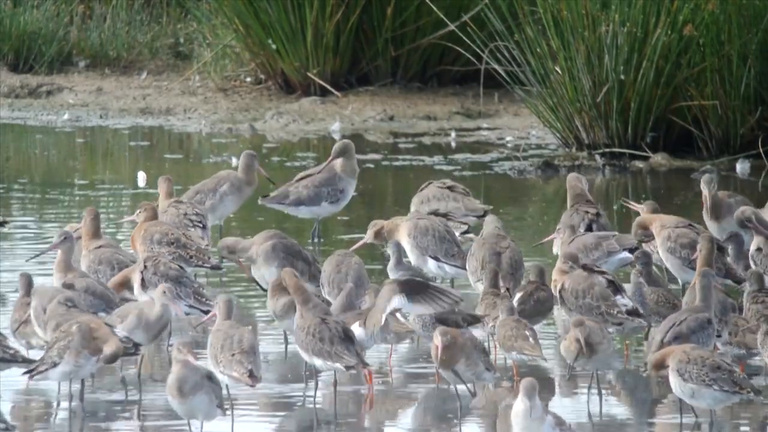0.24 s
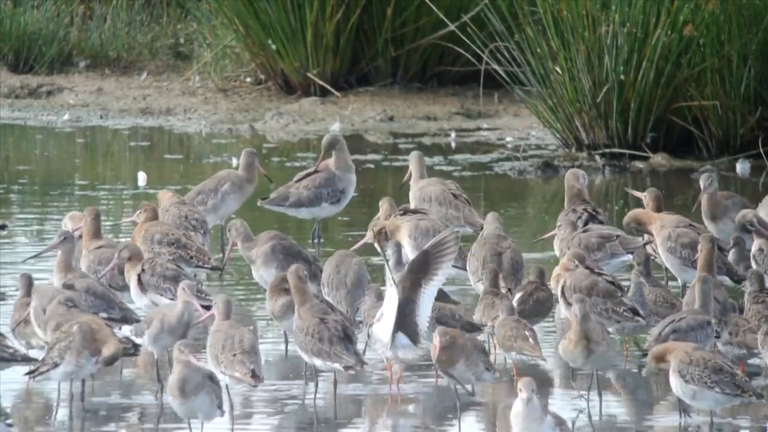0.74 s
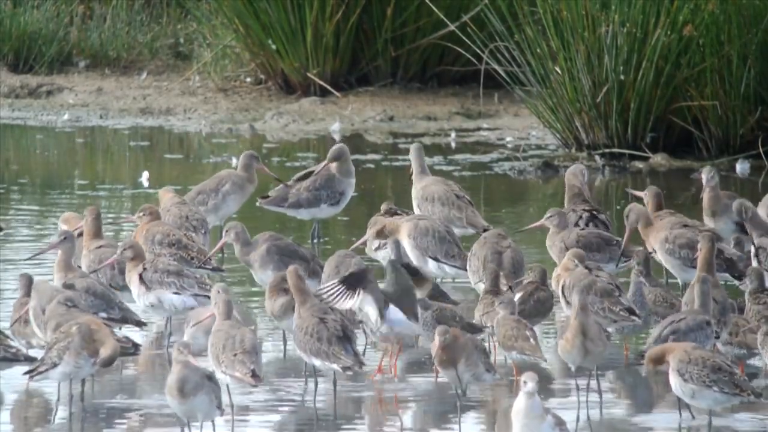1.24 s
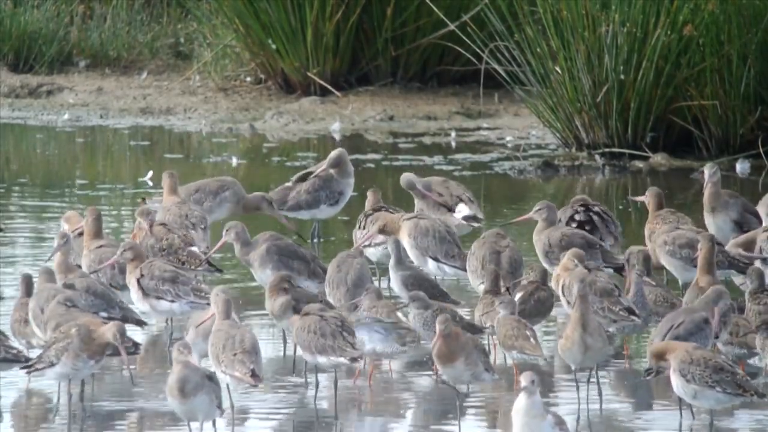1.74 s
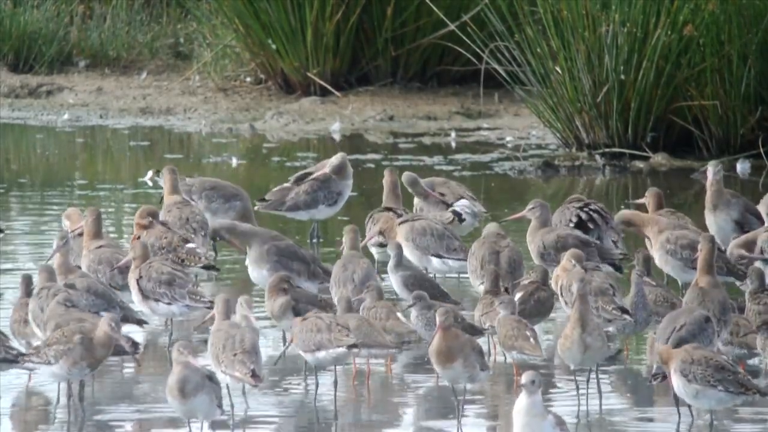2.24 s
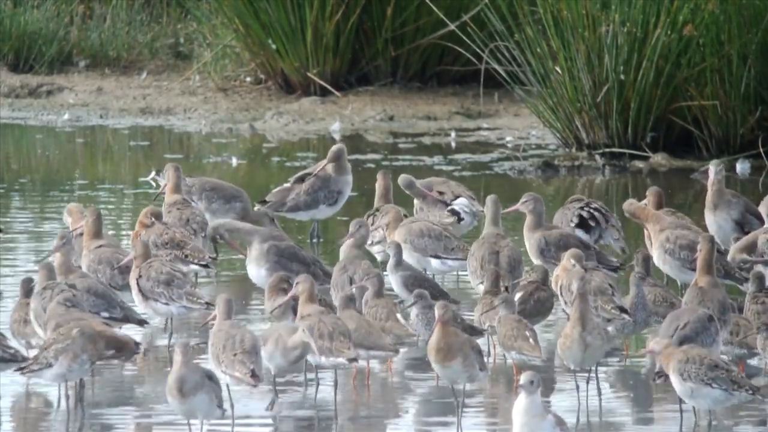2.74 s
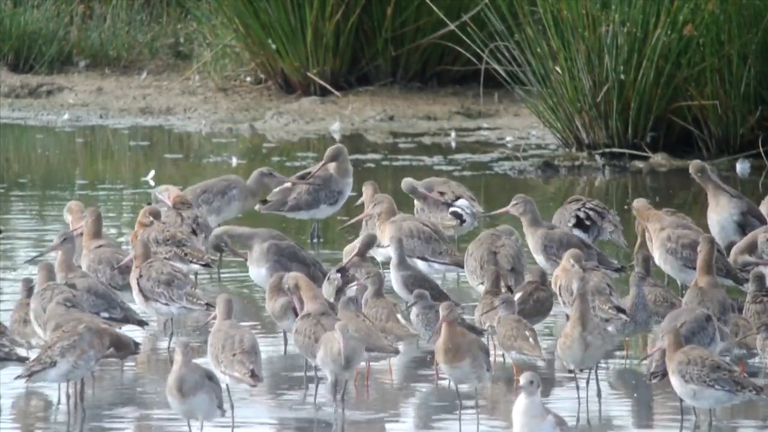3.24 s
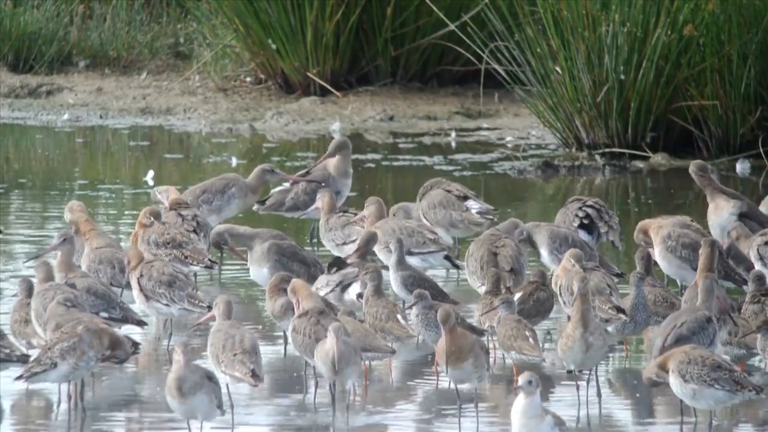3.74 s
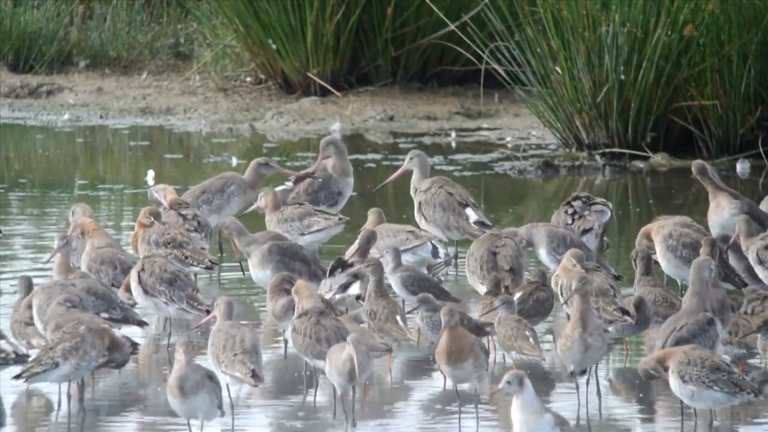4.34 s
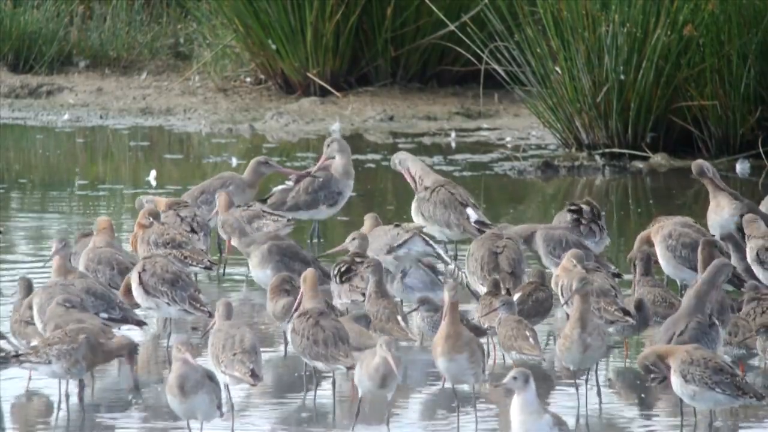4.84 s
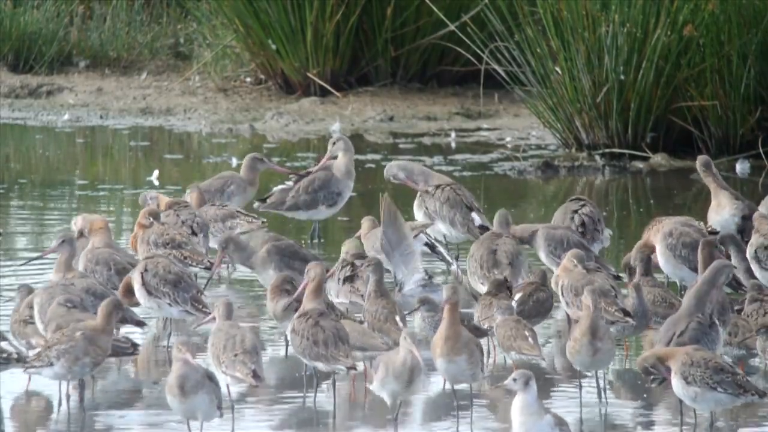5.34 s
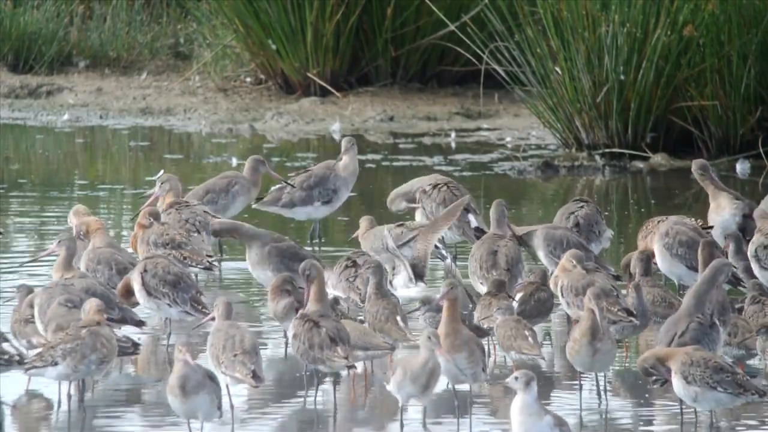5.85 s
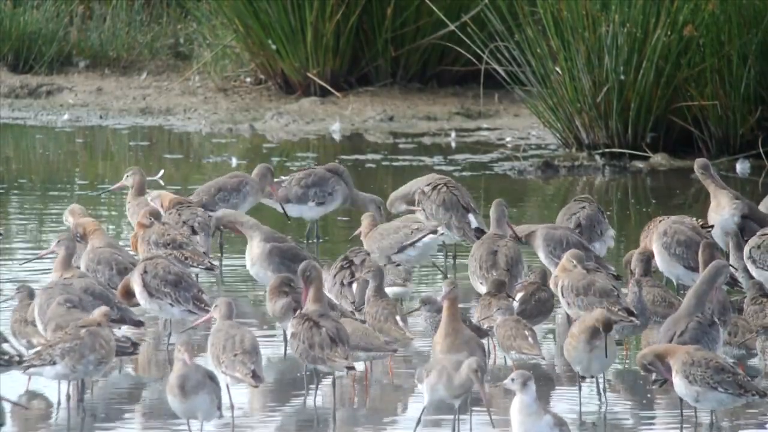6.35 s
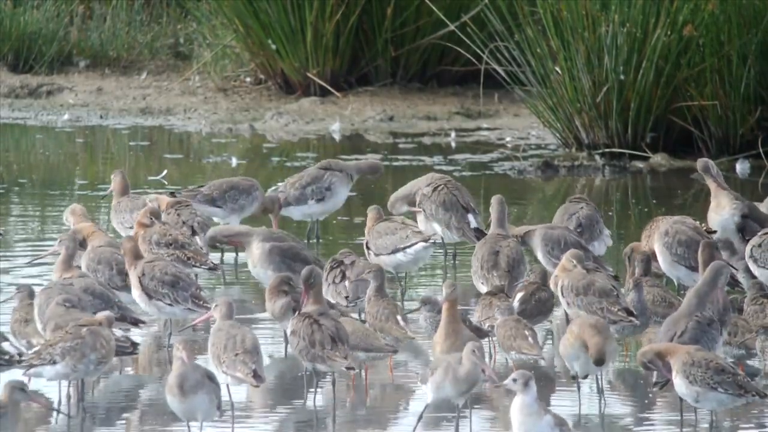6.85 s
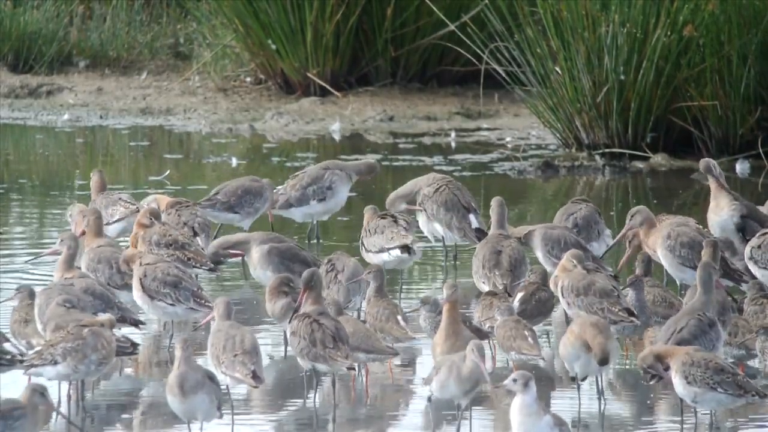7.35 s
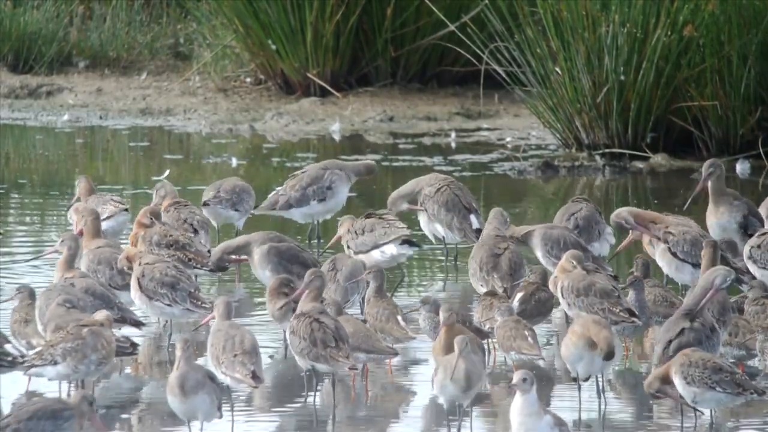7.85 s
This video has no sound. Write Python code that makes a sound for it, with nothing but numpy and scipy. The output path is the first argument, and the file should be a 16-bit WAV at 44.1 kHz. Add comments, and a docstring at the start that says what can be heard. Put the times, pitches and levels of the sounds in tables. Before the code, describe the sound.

A crowded flock of wading birds and gulls chatters with harsh cries and thin whistles over steady hiss, then loud screeches and late wooden knocks.

```python
"""Harsh gull cries and thin whistles over a chattering far crowd, wind rumble and hiss; then broad screeches,
late knocks on wood. A wetland colony heard from a wooden hide through two spaced microphones.
Cries: rattling pulses through throat resonances plus a harmonic stack. Screeches: jittered pulses, noise.
Whistles and pitch lines within cries: wavering sines with rasp. Crowd: random cries and whistles.
Wind, drone, hiss: shaped noise. Knocks: decaying wood modes and noise bursts."""
import sys
import numpy as np
from scipy import signal
from scipy.fft import rfft, irfft, next_fast_len
from scipy.io import wavfile
from scipy.ndimage import uniform_filter1d

SR = 44100
rng = np.random.default_rng(int(sys.argv[2]) if len(sys.argv) > 2 else 0)


def int16_out(signal):
    """Quantize to a 16-bit WAV file."""
    q = np.round(np.clip(np.atleast_2d(signal).T, -1, 1) * 32767)
    wavfile.write(sys.argv[1], SR, q.astype(np.int16))


N = 356769


def undb(db):
    """dB to amplitude ratio."""
    return 10 ** (np.asarray(db) / 20)


def unit(x):
    """Scale to RMS 1."""
    return x / np.sqrt(np.mean(x ** 2, axis=-1, keepdims=True) + 1e-20)


def wander(count, rate_hz):
    """Smooth random motion, RMS 1."""
    k = max(int(SR / rate_hz), 2)
    smooth = uniform_filter1d(rng.standard_normal(count), k)
    return unit(uniform_filter1d(smooth, k))


def shaped(x, gain):
    """Filter by a gain that is a function of frequency."""
    size = next_fast_len(x.shape[-1])
    f = np.arange(size // 2 + 1) * SR / size + 1  # +1 keeps f above zero
    return irfft(rfft(x, size) * gain(f), size)[..., :x.shape[-1]]


def throat(x, modes):
    """Zero-phase sum of steep resonances (f/Hz, width/Hz, level/dB)."""
    def gain(f):
        return sum(undb(db) / (1 + ((f - hz ** 2 / f) / width) ** 2) for hz, width, db in modes)
    return shaped(x, gain)


def noise_band(shape, modes):
    """White noise through resonances, RMS 1."""
    return unit(throat(rng.standard_normal(shape), modes))


def add(out, x, start_s, pan_db, lag_ms):
    """Place a sound; the two microphones hear it at different levels and moments."""
    for channel, sign in enumerate((1, -1)):
        i = int((start_s + sign * lag_ms / 2000) * SR)
        part = (x * undb(sign * pan_db / 2))[max(-i, 0):max(N - i, 0)]
        out[channel, max(i, 0):max(i, 0) + len(part)] += part


def fade(count, rise_s, fall_s):
    """Linear rise and fall."""
    t = np.arange(count) / SR
    return np.clip(np.minimum(t / rise_s, t[::-1] / fall_s), 0, 1)


def pulses(hz, jitter, noise, uneven):
    """Air puffs of unsteady period, strong-weak in turn to a varying degree, mixed with turbulence."""
    count = len(hz)
    unsteady = 1 + jitter * wander(count, 500) + .012 * wander(count, 30.37)
    phase = np.cumsum(hz * unsteady) / SR
    top = int(12000 / hz.max())
    # equal harmonics 1 to top
    puffs = np.sin(np.pi * (2 * top + 1) * phase) / (np.sin(np.pi * phase) + 1e-12) - 1
    puffs = puffs * (1 + uneven * wander(count, 45) * np.cos(np.pi * phase))
    return unit(puffs) + noise * rng.standard_normal(count)


def rattle(count, rate_hz, depth):
    """The syrinx membranes beat unevenly, chopping the cry into throbs."""
    phase = np.cumsum(rate_hz * (1 + 0.3255 * wander(count, 21.9))) / SR
    return np.exp(depth * np.cos(2 * np.pi * phase) + 0.16 * wander(count, 90))


# Cry resonances, lower and upper throat: f/Hz, width/Hz, level/dB
LOWER_THROAT = [(1000, 420, -24), (1726, 130, 13), (1832, 120, 3), (2362, 410, 9.5), (2720, 4100, -15)]
UPPER_THROAT = [(4190, 2800, 6.5), (4500, 990, 5), (6660, 2700, -15.5), (7550, 1900, -6.5)]
# Steady harmonics of a cry, lower and upper throat: multiple of the fundamental, level/dB
CLEAR_LOWER = [(1, -24), (2, 0), (3, -21)]
CLEAR_UPPER_STACK = [(3, -14.5), (4, 7), (5, 6), (6, -26), (7, -1)]


def cry(second_hz, upper_db, clear_db):
    """Gull cry near 1 kHz: harsh pulses plus steadier harmonics; the lower throat rattles most."""
    count = len(second_hz)
    source = pulses(second_hz / 2, jitter=.03, noise=.65, uneven=.45)
    throb = rattle(count, 46, depth=.7)
    waver = 1 + 0.0128 * wander(count, 320) + 0.00607 * wander(count, 30.5)
    phase = np.pi * np.cumsum(second_hz * waver) / SR  # fundamental: half of second_hz

    def stack(table):
        return unit(sum(undb(db) * np.sin(round(k) * phase) for k, db in table))

    beat = rattle(count, 92, depth=.35) * np.sqrt(throb)
    harsh_low = unit(throat(source * throb, LOWER_THROAT))
    low = harsh_low + undb(clear_db) * unit(stack(CLEAR_LOWER) * beat)
    harsh_high = unit(throat(source * np.sqrt(throb), UPPER_THROAT))
    high = harsh_high + undb(clear_db) * stack(CLEAR_UPPER_STACK)
    return unit(low) + undb(upper_db) * unit(high)


OPENING_S, OPENING_DB = 0.028, -9  # bill opens: upper resonances start this much duller
RELEASE_S = .03


def place_calls(voice, calls, attack_s):
    """Pitch and level drift up or down over each breath; the opening bill brightens it."""
    out = np.zeros((2, N))
    for t0, length_s, hz, end_drop_hz, db, fading_db, colour_db, pan_db, lag_ms, *voice_setting in calls:
        t = np.arange(int(length_s * SR)) / SR
        pitch_hz = hz - end_drop_hz * (t / length_s) ** 1.6
        bright_db = colour_db + OPENING_DB * np.exp(-t / OPENING_S)
        call = voice(pitch_hz, bright_db, *voice_setting)
        level = undb(db - fading_db * t / length_s) * fade(len(t), attack_s, RELEASE_S)
        add(out, call * level, t0, pan_db, lag_ms)
    return out


# Near cries: t/s, length/s, second harmonic f/Hz, drop by end/Hz (negative rises), level/dB,
# fading by end/dB (negative swells), upper throat/dB, left minus right/dB, left lag/ms, clear over harsh/dB
NEAR_CRIES = [(-.1, 0.2, 1920, 57, -49, 2, -17, -5, .3, -9),
              (0.171, 0.45, 2041, 160.5, -35.5, 7, 1.5, -2, 0.4, -14),
              (.385, .215, 2130, 330, -36, -6, -13, -6, .4, 13),
              (.6, 0.44, 2050, -110, -44.5, -0.5, 3, 1, 0.32, -9),
              (1.261, 0.31, 1935, 109, -32, 7, -13, -4.5, -.2, -6),
              (1.311, 0.38, 2031, 11.5, -36.5, 5.5, 6, -2.5, -0.32, -3),
              (1.51, .175, 1885, 60, -36, -10, -15, -2, -.2, 3),
              (1.669, 0.32, 1877, -190, -34, 17, -6, -3.5, -0.27, -14),
              (2.48, 0.45, 2021, 16, -38.5, 3, -4, -2, 1.48, -13),
              (2.898, 0.28, 1948, -10, -44, 8, -12, -2, 1.5, -4),
              (3.492, 0.26, 1930, 190, -41.5, 7, -10, -11, .2, -8),
              (3.75, 0.22, 1915, 26, -38.5, 9.5, -11, -5.5, .2, -5),
              (4.048, 0.48, 2098, 142, -45, -2.5, -12, -6, 0, -12),
              (4.865, .37, 2074, 289.5, -30.5, 0, -11.5, -5, -1.5, -3),
              (5.201, 0.085, 2036, 50, -31, 2, -15, -2.5, -1.5, -1),
              (5.272, 0.5, 1952, -100, -42, 5, 1.5, -2.5, 0.51, -9),
              (6.559, 0.42, 2000, 112.5, -44, 10, -14, -4, .2, 7),
              (7.048, 0.29, 1913, 60.5, -40.5, -1, -13, -3, 0.23, -2),
              (7.949, 0.21, 1982, -44, -47, -2, -5, 1, 0, -3)]


def near_cries():
    """Gull cries that stand out of the crowd, voiced by cry()."""
    return place_calls(cry, NEAR_CRIES, attack_s=0.015)


def whistle(length_s, pitch_hz, octave_db, waver_hz):
    """Sine and octave with trembling pitch and strength; more waver brings more rasp."""
    count = int(length_s * SR)
    hz = np.interp(np.linspace(0, 1, count), [0, .2, .6, 1], pitch_hz)
    hz = uniform_filter1d(hz, count // 8)
    phase = 2 * np.pi * np.cumsum(hz + waver_hz * wander(count, 654)) / SR
    rasp = noise_band(count, [(0.77 * hz.mean(), 900, 0), (1.3 * hz.mean(), 1500, -2)])
    tone = np.sin(phase) + undb(octave_db) * np.sin(2 * phase) + waver_hz / 330 * rasp
    tremble = undb(2.4 * wander(count, 80))
    return unit(tone * tremble * fade(count, .02, .04))


# Whistles, their pieces, pitch lines within cries: t/s, length/s, f/Hz, start below f/Hz (negative above),
# drop by end/Hz (negative rises), level/dB, octave/dB, left minus right/dB, pitch waver/Hz
NEAR_WHISTLES = [(-.03, 0.22, 4750, -230, -100, -44, -30, -1, 68),
                 (.05, 0.28, 4144, 296.5, 233, -40, -16, -4, 35),
                 (0.187, 0.23, 1770, 37, -60, -41, -30, -7, 50),
                 (0.183, 0.032, 2060, 0, 0, -33.5, -30, -3, 57), (.2, .2, 2330, 150, 30, -39.5, -30, 0, 55),
                 (.2, .11, 2860, 0, 0, -44, -30, -3, 60), (.63, .11, 2040, 0, 0, -43, -30, -3, 40),
                 (.3, 0.14, 2160, 2, 5, -37, -25, -4, 52), (0.332, 0.27, 4030, 2, 114, -44, -30, -5, 68),
                 (0.511, 0.2, 4354, 391, -60, -44, -30, -16, 124),
                 (0.684, 0.14, 2913, -90, 110, -39, -20, -8, 61),
                 (0.858, 0.22, 2386, -3, 28, -48, -30, -4, 56), (.965, .08, 4770, 50, 0, -45.5, -37, 3, 44),
                 (1.09, .085, 4750, 0, 500, -46, -37, 3, 60), (1.303, 0.1, 5040, 7, 2, -37, -17, -2, 138),
                 (1.34, .07, 5200, 0, 0, -47, -30, -1, 60), (1.53, 0.086, 3050, 2, 30, -40.5, -30, -4, 32),
                 (1.341, 0.23, 2490, 146, 333, -37.5, -30, -4, 110),
                 (1.653, 0.45, 4266, 324, 201, -42, -31, -2, 100),
                 (1.693, 0.066, 2054, -33, -4, -46, 1, -11, 36),
                 (1.82, .2, 3080, 0, 396, -43, -30, -6, 150), (1.75, .11, 2500, 40, 60, -44, -30, -4, 30),
                 (1.43, .08, 2420, 0, 60, -39, -30, -4, 40), (1.335, .17, 2790, 0, 30, -44, -30, -4, 70),
                 (1.913, 0.22, 5480, 0, 300, -48, -30, 3, 110),
                 (2.098, 0.23, 5150, 330, 250, -49, -30, -2, 160),
                 (2.296, .21, 2010, -43, 90, -40.5, -32, -7, 62),
                 (2.299, 0.17, 4640, 40, 150, -49.5, -30, 11, 20),
                 (2.143, 0.13, 1720, 0, 6, -47.5, -30, 1, 36),
                 (2.475, .07, 3750, 150, -100, -46, -30, -5, 120),
                 (2.53, .24, 4300, 60, 123, -38, -34, -5.5, 80),
                 (2.524, 0.25, 2486, 135, 189, -40, -30, 1, 112),
                 (2.603, 0.26, 3000, -130, 430, -45.5, -30, -9, 87),
                 (2.81, .09, 4900, 378, -200, -48, -27, -2, 94),
                 (3.053, 0.18, 4680, 40, 192, -52, -30, 3, 45), (3.31, .155, 3670, 0, 30, -46.5, -30, 3, 8),
                 (3.5, .05, 3150, 0, 0, -47, -30, -6, 110), (3.514, 0.23, 2325, 0, 60, -48, -30, 0, 69),
                 (3.497, .11, 4200, 700, 150, -47, -29, -5, 90), (3.6, .07, 4150, 0, 80, -45, -29, -5, 110),
                 (3.6, .16, 3050, 0, 220, -44.5, -14, -4, 93), (3.655, .06, 4970, 0, 0, -47, -30, 4, 54),
                 (3.804, 0.2, 3900, 135, 405, -52, -30, 3, 47), (3.8, .19, 5350, 230, 30, -50, -30, 1, 170),
                 (4.077, 0.19, 3620, 10, -30, -52, -17, 0, 33),
                 (4.102, 0.21, 2383, -140, 15, -44, -19, 4, 65),
                 (4.115, 0.18, 4410, 70, 390, -48, -30, -5.7, 82),
                 (4.412, 0.26, 4240, 500, -250, -40.5, -32, -7, 81),
                 (4.595, 0.3, 3063, 78, 103, -43.5, -30, -6.5, 230),
                 (4.495, 0.096, 4960, -3, 42, -45, -30, -.2, 51),
                 (4.821, 0.078, 2080, 0, -2, -43, -30, -5, 45),
                 (4.874, 0.055, 2020, 26, 38, -35, -26, -4, 46),
                 (5.237, 0.029, 2710, 0, 0, -45, -30, -6, 30),
                 (5.361, .06, 3560, 4, -500, -41, -25, -13, 100),
                 (5.397, .06, 4230, 250, 60, -33.5, -27, -10.5, 79),
                 (5.434, 0.065, 4090, -120, -170, -30.5, -27, -13, 55),
                 (5.488, 0.05, 4080, -80, 2, -31.5, -27, -12, 56),
                 (5.45, 0.084, 2516, 0, 0, -41, -30, -6, 35),
                 (5.503, 0.094, 2960, 0, -80, -39, -30, -5, 70),
                 (5.661, .07, 2090, 0, 80, -43, -30, -5, 30),
                 (5.536, 0.087, 4060, 0, 60, -37.5, -25, -11, 77),
                 (5.38, 0.043, 2460, 100, 100, -55, -14, 4, 27),
                 (5.57, .14, 2783, -60, 332, -37, 0, -4, 40),
                 (5.816, 0.31, 3380, -190, 126, -47.5, -30, 2, 200),
                 (5.894, 0.15, 4380, 250, 76, -46, -30, -1, 41),
                 (6.037, 0.076, 4850, 100, -330, -50, -30, -3, 35),
                 (6.1, .2, 4550, 35, 80, -42, -26, 1, 60), (6.185, .075, 3700, 100, 0, -46, -30, -3.4, 20),
                 (6.45, .05, 3300, 200, 400, -48, -23, 2, 60),
                 (6.545, .17, 3980, -130, 450, -50, -36, 4, 70),
                 (6.71, 0.11, 3480, -80, 220, -51, -36, 0, 35), (6.869, 0.28, 2914, 1, 45, -52, -30, 2, 30),
                 (7, .24, 4650, 246, 500, -46, -15, 3, 56), (7.22, .13, 4130, -150, 250, -46, -9, 2, 40),
                 (6.97, 0.21, 4840, -2, 58, -52, -30, -3, 60),
                 (7.345, .13, 3800, -50, 25, -47.5, -14, -1, 25),
                 (7.011, 0.19, 5500, 188, 298, -49, -30, 1, 160),
                 (7.062, 0.2, 2443, 174, 150, -43.5, -29, 1, 110),
                 (7.61, 0.19, 4600, 140, 40, -55, -30, 1.4, 38),
                 (7.76, 0.13, 4540, 0, 37, -49, -30, 1.4, 63),
                 (7.854, 0.13, 4590, 100, 40, -48.5, -30, 3, 38),
                 (7.97, 0.12, 4600, 0, 550, -49, -30, 1.4, 42),
                 (7.651, 0.23, 2068, -2, 20.5, -47.5, -30, -6, 28),
                 (7.853, 0.17, 2040, 0, 22, -52, -33, -7, 32)]
START_BEND_SHARE = .1  # start bend decay constant, share of call
LAG_SPREAD_MS = 2.4  # between microphones, before rounding


def near_whistles():
    """Thin whistles, pieces of stepped whistles, pitch lines within cries; each may bend at start and end."""
    out = np.zeros((2, N))
    along = np.array([0, .2, .6, 1])
    lags_ms = LAG_SPREAD_MS * rng.standard_normal(len(NEAR_WHISTLES))
    for call, lag_ms in zip(NEAR_WHISTLES, lags_ms):
        t0, length_s, hz, start_below_hz, end_drop_hz, db, octave_db, pan_db, waver_hz = call
        # whole cycles plus a quarter: channels neither add up nor cancel
        lag_ms = 1000 * (round(lag_ms * hz / 1000) + .25) / hz
        pitch_hz = hz - start_below_hz * np.exp(-along / START_BEND_SHARE) - end_drop_hz * along ** 2
        add(out, undb(db) * whistle(length_s, pitch_hz, octave_db, waver_hz), t0, pan_db, lag_ms)
    return out


# Crowd loudness: t/s, level/dB
CROWD_LEVEL = [(0, -32), (.17, -35.5), (.25, -33.5), (.6, -34), (1.15, -42), (1.9, -38.5), (2.4, -47.5),
               (3, -38.5), (3.35, -42.5), (4.6, -44), (5.8, -43.5), (6.4, -44.5), (6.9, -43), (7.5, -44),
               (8.09, -57)]


def crowd(count=130):
    """Far gulls and whistlers at random times and sides, evened out, then set to the level curve."""
    out = np.zeros((2, N))
    for when, size, pitch, side, kind in rng.random((count, 5)):
        length_s = .15 + .3 * size
        if kind < .75:
            arch = np.linspace(1.03, .95, int(length_s * SR))  # falling pitch
            call = cry((1800 + 400 * pitch) * arch, -5.5, -8) * fade(len(arch), 0.077, 0.045)
        else:
            pitch_hz = (3000 + 2400 * pitch) * np.array([.97, 1, 1, .95])
            call = undb(-12) * whistle(length_s, pitch_hz, -30, 60)
        add(out, call, (when * N / SR) - .2, 8 * (side - .6), 4 * (side - .5))
    t_s, db = np.transpose(CROWD_LEVEL)
    power = uniform_filter1d(np.mean(out ** 2, axis=0), SR // 2)
    steady = out / np.sqrt(power + 0.1)
    return steady * undb(np.interp(np.arange(N) / SR, t_s, db))


SCATTER_T60_S = .24


def scatter(x, wet_db):
    """Water, reeds and hide walls return a short, different tail to each microphone."""
    t = np.arange(int(.3 * SR)) / SR
    tail = rng.standard_normal((2, len(t))) * undb(-60 * t / SCATTER_T60_S) * (t > .002)
    tail /= np.sqrt(np.sum(tail ** 2, axis=1, keepdims=True))
    wet = signal.fftconvolve(x, tail, axes=1)[:, :N]
    return (x + undb(wet_db) * wet) / np.sqrt(1 + undb(2 * wet_db))


def turned(lead_rad, own_db):
    """Noise common to both microphones, phase-shifted between them, plus some of their own."""
    shared = signal.hilbert(rng.standard_normal(next_fast_len(N)))[:N]
    turn = np.exp(.5j * lead_rad * np.array([[-1], [1]]))
    return np.real(shared * turn) + undb(own_db) * rng.standard_normal((2, N))


# Wind: t/s, buffeting level/dB, rumble level/dB, low roar level/dB
WIND_LEVELS = [(0.0, -72, -62, -63), (0.13, -66, -66, -59), (0.63, -64.5, -73, -55),
               (1.64, -63, -66, -63.5), (1.76, -64, -77, -64), (2.07, -80, -62, -62),
               (2.16, -66, -62.5, -72), (2.46, -70, -61.5, -63), (3.42, -66, -72, -61),
               (3.9, -66, -74, -61), (4.85, -64, -65.5, -56), (4.91, -61, -77, -55), (5.0, -63, -65, -54.5),
               (5.25, -60, -73, -56), (6.74, -70, -66.5, -66), (6.94, -62.5, -65.5, -59.5),
               (7.68, -64, -72, -57), (8.09, -57, -68, -72)]
# Right-over-left phase lead: t/s, buffeting/rad, roar/rad
WIND_PHASE = [(0, 2.3, 1.2), (1.8, 2.3, 1.2), (2.2, 3, 3.2), (4.5, 3, 3.2), (5, .6, 3.2), (6.4, .6, 3.2),
              (6.8, 1.3, 2.9), (8.09, 1.3, 2.9)]
GUSTS_PER_S, GUST_DB = 3.5, 2.5  # buffeting unsteadiness: smoothing rate, RMS
BUFFET_OWN_DB, ROAR_OWN_DB = -11, -6  # noise each microphone has alone


def wind():
    """Buffeting, rumble and low roar: noise bands, buffeting and roar shared but out of step."""
    t = np.arange(N) / SR
    t_s, buffet_db, rumble_db, roar_db = np.transpose(WIND_LEVELS)
    turn_s, buffet_rad, roar_rad = np.transpose(WIND_PHASE)
    buffet_noise = turned(np.interp(t, turn_s, buffet_rad), BUFFET_OWN_DB)
    buffet = unit(throat(buffet_noise, [(65.0, 52, -1), (45, 100, -11)]))
    roar_noise = turned(np.interp(t, turn_s, roar_rad), ROAR_OWN_DB)
    roar = unit(throat(roar_noise, [(279, 260, 0)]))
    opposed = np.array([[1, -.12], [-.12, 1]])  # channels slightly out of phase
    rumble = unit(throat(opposed @ rng.standard_normal((2, N)), [(142, 75, 0)]))
    gusty_db = np.interp(t, t_s, buffet_db) + GUST_DB * wander(N, GUSTS_PER_S)
    out = undb(gusty_db) * buffet
    out += undb(np.interp(t, t_s, roar_db)) * roar
    return out + undb(np.interp(t, t_s, rumble_db)) * rumble


# Far drone: t/s, level/dB
DRONE_LEVEL = [(0, -66), (1.6, -63), (2.6, -68), (3.5, -60), (4.3, -75), (8.09, -75)]


def far_drone():
    """Noise band around 660 Hz following a level curve."""
    level = undb(np.interp(np.arange(N) / SR, *np.transpose(DRONE_LEVEL)))
    return level * noise_band((2, N), [(660, 220, 0)])


# Hiss spectrum: f/Hz, relative density/dB
HISS_SPECTRUM = [(25, -15), (60, -5), (150, -9), (500, 0), (700, .5), (1000, 4.5), (1500, 5.5), (3000, 4.5),
                 (6000, -1.5), (12000, -3), (15700, -4.5)]
HISS_DB = -43


def recorder_hiss():
    """Steady noise, spectrum interpolated over log frequency, independent per channel."""
    hz, db = np.transpose(HISS_SPECTRUM)

    def gain(f):
        return undb(np.interp(np.log(f), np.log(hz), db))

    return undb(HISS_DB) * unit(shaped(rng.standard_normal((2, N)), gain))


# Screech resonances, body and treble: f/Hz, width/Hz, level/dB
SCREECH_BODY = [(2450, 2100, -12.5)]
SCREECH_RASP = [(7410, 1900, 8), (9300, 1300, 3), (11000, 2700, -2.5)]


def screech(hz, treble_db, split_hz):
    """A chaotic voice: no steady pitch, a broad pair of resonances and a bright rasp."""
    source = pulses(hz / 5, jitter=.2, noise=1.8, uneven=.8)
    source = source * rattle(len(hz), 105, depth=.32)
    pair = [(hz.mean() + side * split_hz / 2, 800, -3) for side in (-1, 1)]
    body = throat(source, pair + SCREECH_BODY)
    return unit(body) + undb(treble_db) * unit(throat(source, SCREECH_RASP))


# Near screeches: t/s, length/s, throat resonance f/Hz, drop by end/Hz (negative rises), level/dB,
# fading by end/dB, treble/dB, left minus right/dB, left lag/ms, resonance split/Hz
NEAR_SCREECHES = [(1.947, 0.26, 5120, 55, -44, 1, -10, 2, .5, 300),
                  (3.132, 0.071, 4680, 0, -34.5, 6, -24, 0, -0.67, 300),
                  (4.13, 0.15, 5110, 300, -36.5, 12, -4, -2.5, 0.7, 300),
                  (4.407, 0.52, 4770, 224.5, -44.5, 1.5, -26, -1, -.4, 300),
                  (4.894, 0.52, 4954, 150.5, -27.7, 9, -9.5, -3, -1.6, 250),
                  (5.359, 0.31, 4800, -450, -32.3, 5.5, -8.5, -2.5, 0.57, 500),
                  (6.203, .37, 4830, -50, -31, 4, -9.5, -4, -1.03, 750)]


def near_screeches():
    """Broad gull screeches, voiced by screech(), slower to rise than cries."""
    return place_calls(screech, NEAR_SCREECHES, attack_s=0.056)


# Blows: t/s, level/dB, tick (sharpness)/dB
BLOWS = [(7.322, -44.5, -40), (7.483, -38.5, 10), (7.491, -36, -17)]
# Wood modes: f/Hz, level/dB, t60/s
WOOD_MODES = [(429, -2, .15), (635, -8, 0.052), (810, -5, .12), (1027, 11, 0.049), (1190, -1, 0.032),
              (1720, -14, 0.046), (2710, 2, .03)]
# Air in the hide; planks rattling on: f/Hz, width/Hz, level/dB, t60/s
AIR_BOOM = (440, 156, -13.5, 1.2)
PLANK_RATTLE = (950, 900, -11, .5)


def knocks():
    """Blows ring the wooden hide and the air in it; a sharp one also ticks."""
    out, t = np.zeros((2, N)), np.arange(int(.6 * SR)) / SR
    for start_s, db, tick_db in BLOWS:
        blow = np.zeros(len(t))
        for hz, mode_db, t60_s in WOOD_MODES:
            start_phase = 2 * np.pi * rng.random()
            blow += undb(mode_db - 60 * t / t60_s) * np.sin(2 * np.pi * hz * t + start_phase)
        for hz, width_hz, band_db, t60_s in (AIR_BOOM, PLANK_RATTLE):
            blow += undb(band_db - 60 * t / t60_s) * noise_band(len(t), [(hz, width_hz, 0)])
        tick = noise_band(len(t), [(4000, 3800, 5), (8600, 4000, -4), (12900, 6600, -2)])
        blow += undb(tick_db - 60 * t / 0.065) * tick
        add(out, undb(db) * blow * np.clip(t / .003, 0, 1), start_s, 0, -.15)
    return out


def scene():
    """Near birds and crowd, each scattered, over wind, drone and hiss, plus knocks."""
    near_birds = near_cries() + near_whistles() + near_screeches()
    birds = scatter(near_birds, wet_db=-3) + scatter(crowd(), wet_db=-2.5)
    return birds + wind() + far_drone() + recorder_hiss() + knocks()


TOP_HZ = 15800


def record(dry):
    """The recorder cuts the top steeply: elliptic low-pass."""
    return signal.sosfilt(signal.ellip(12, .2, 75, TOP_HZ, fs=SR, output="sos"), dry)


dry = scene()
out = record(dry)
int16_out(out)
```